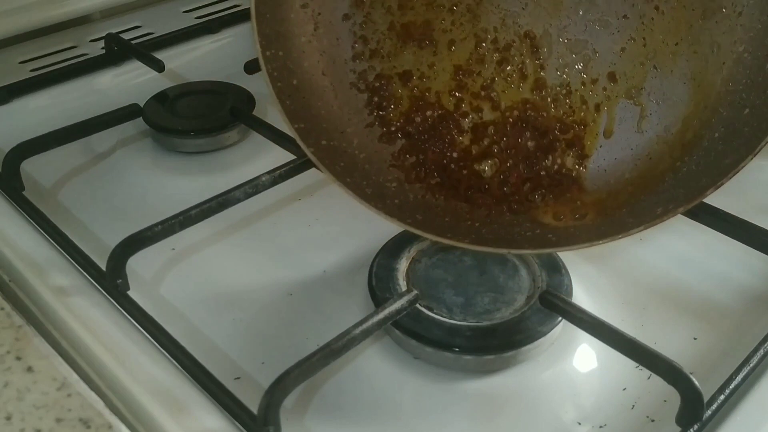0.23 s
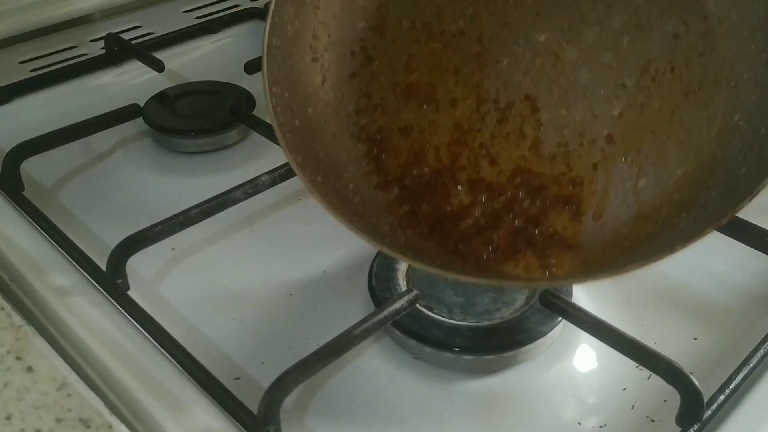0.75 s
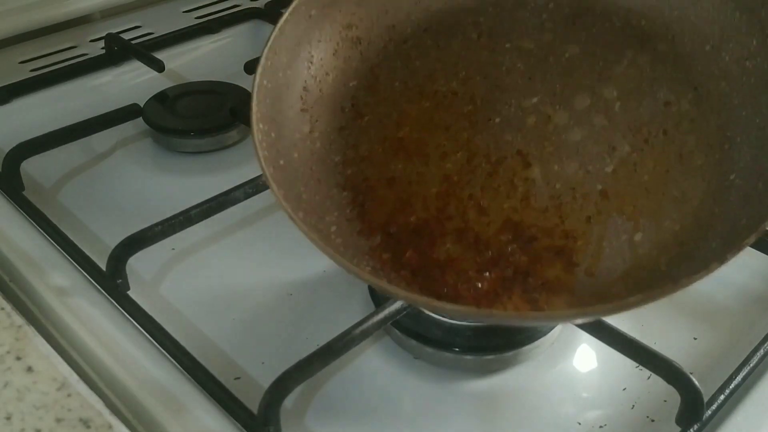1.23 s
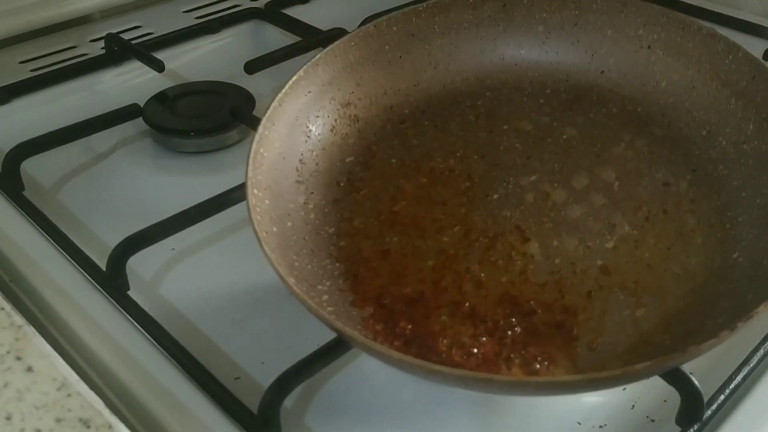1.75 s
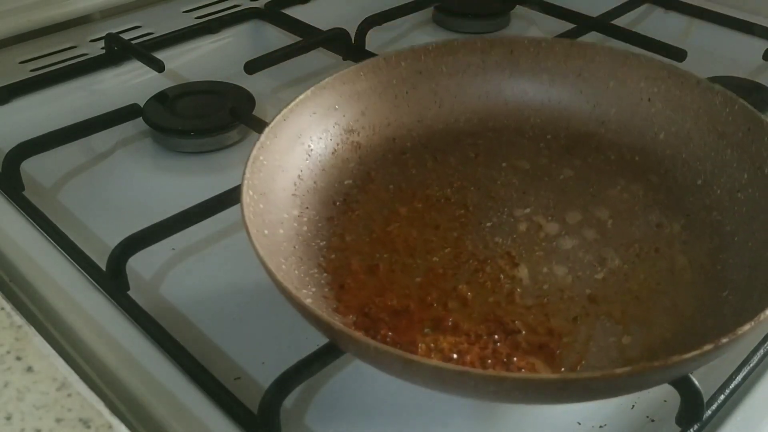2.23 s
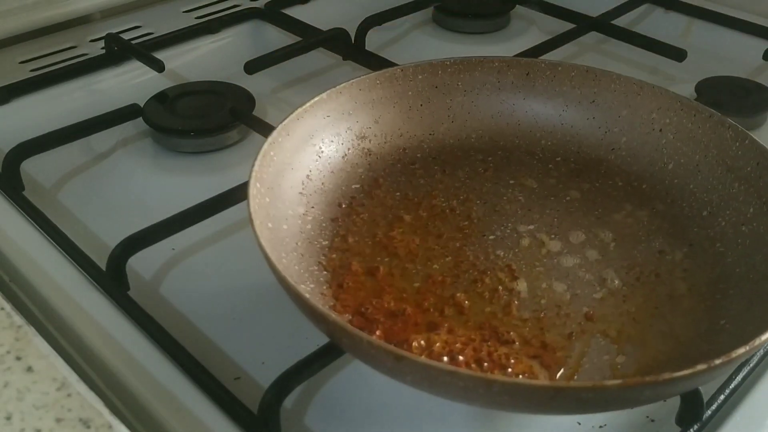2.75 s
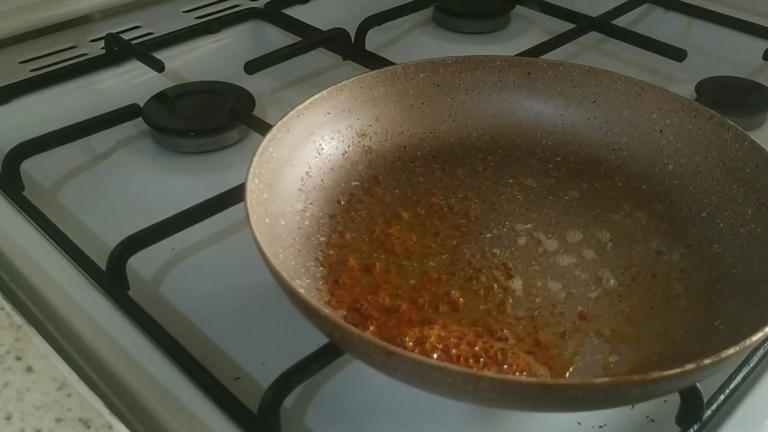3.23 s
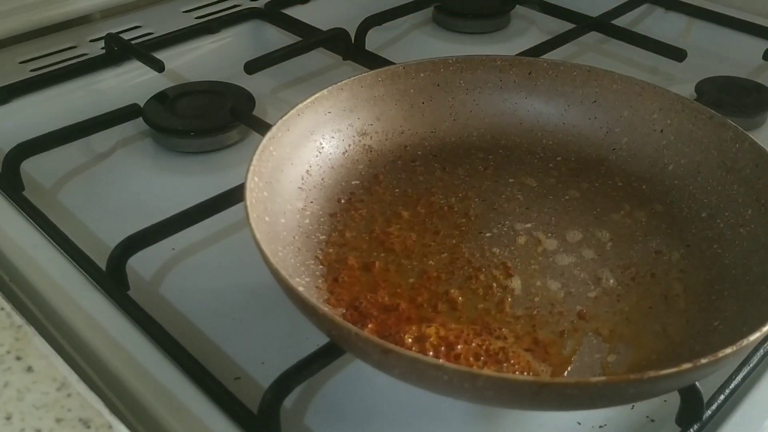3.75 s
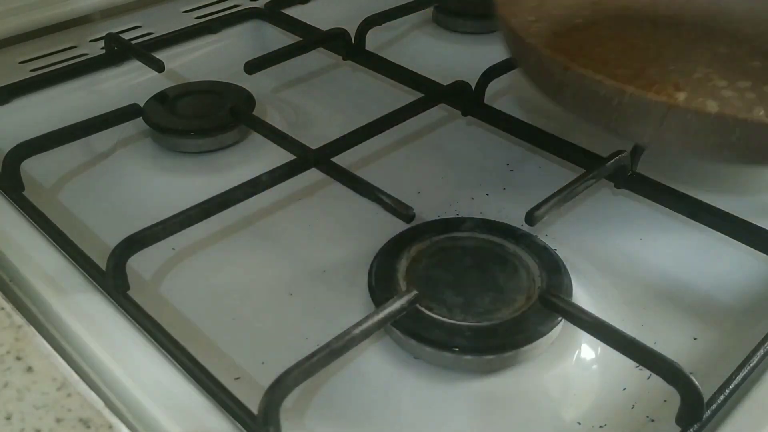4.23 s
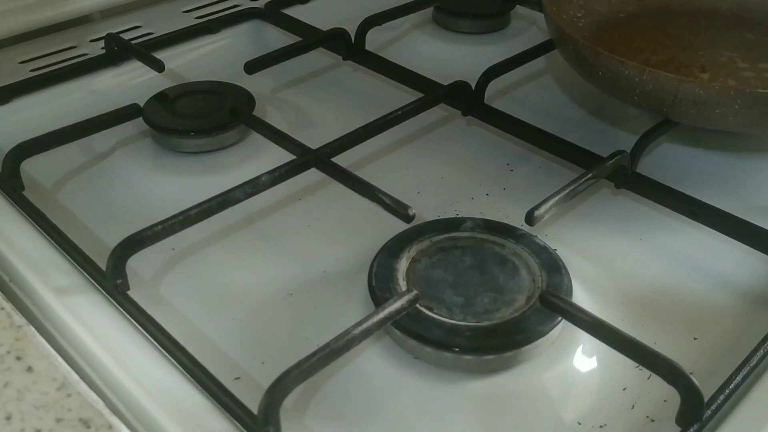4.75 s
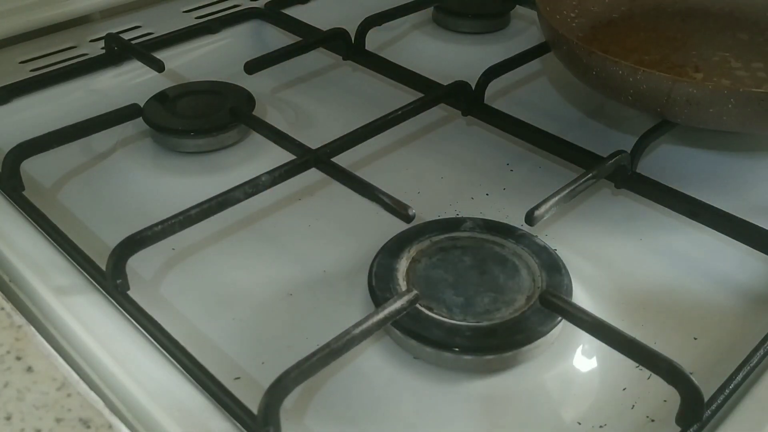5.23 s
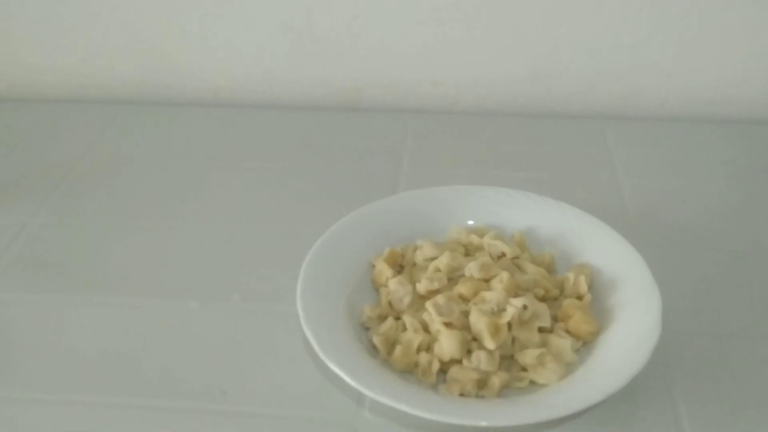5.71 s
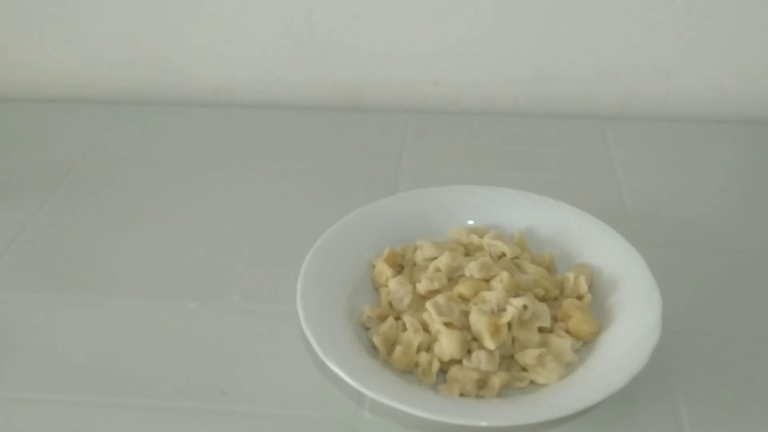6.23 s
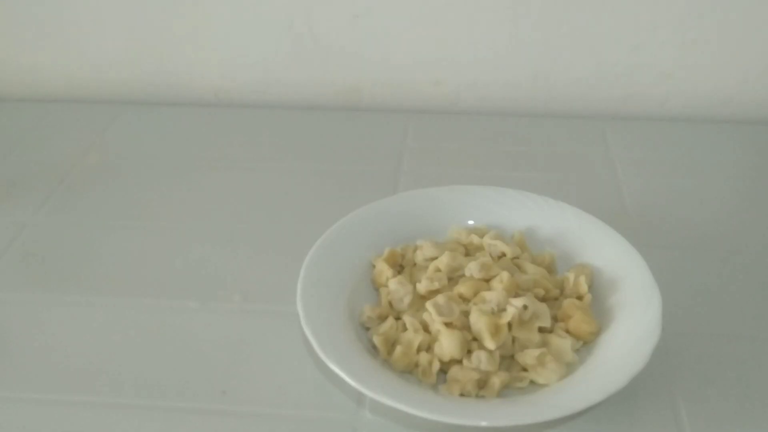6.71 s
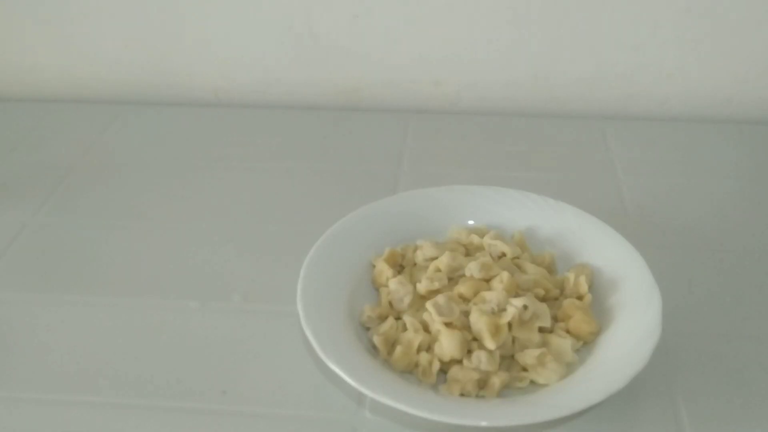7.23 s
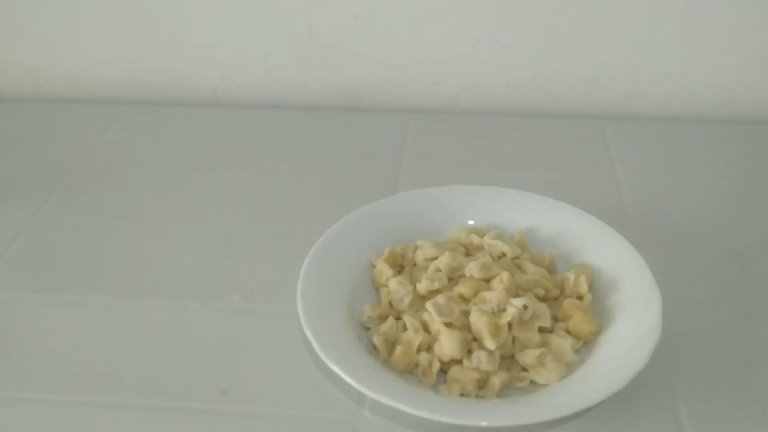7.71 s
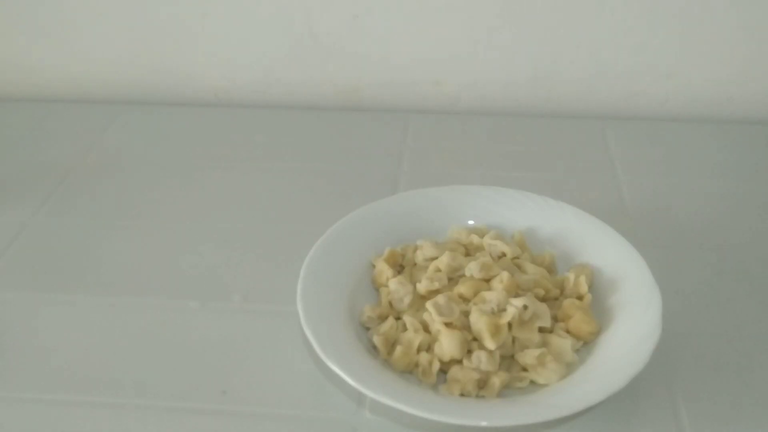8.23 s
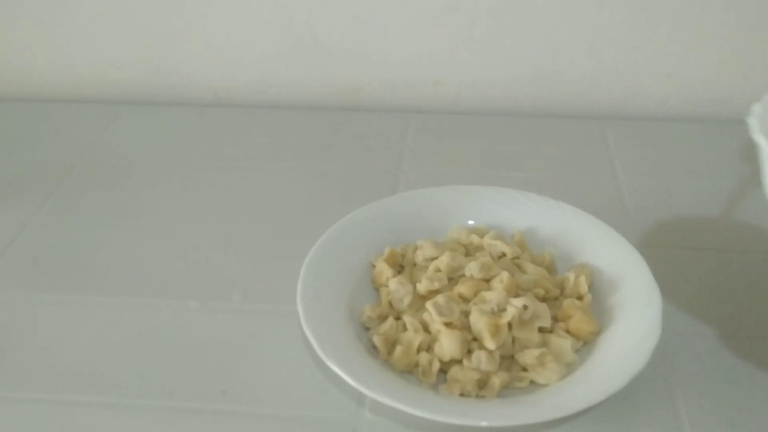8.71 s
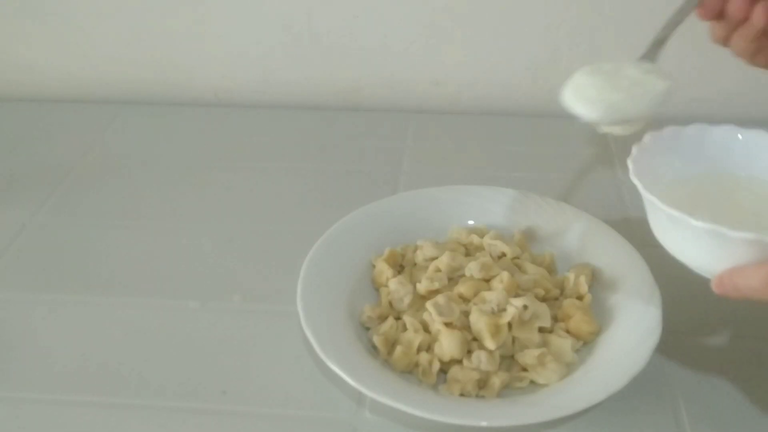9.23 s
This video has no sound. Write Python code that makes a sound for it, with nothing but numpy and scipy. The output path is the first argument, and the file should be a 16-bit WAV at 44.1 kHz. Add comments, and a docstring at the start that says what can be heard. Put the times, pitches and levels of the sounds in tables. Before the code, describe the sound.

A low, steady fridge hum fills a small kitchen, with a faint fizz of cooling oil that dies down over the first seconds. Tiny oil ticks come at about 1.4 seconds and again between 2 and 2.5. A frying pan knocks on the stove's iron grate at about 1.7 and 2.4 seconds, then gives a sharp, louder clack at 2.8 and another at 3.9. Each knock has a short metallic ring and a slight thud from the stove top. A duller knock follows at 4.8 seconds, and the pan settles with a quick clatter around 5.1. At about 5.6 seconds the sound drops out briefly and fades back in as a much quieter hum. A spoon clinks in a china bowl at about 7.2, 7.5 and 7.8 seconds, to the left, each clink softer. Only the quiet hum remains until the end.

```python
"""A fridge hums and cooling oil fizzes and ticks; then a frying pan knocks on a stove's iron grate.
Each impact excites the damped modes of pan, grate and sheet metal top; the longer the contact,
the duller the crack. The sound drops out and fades back in at a quieter table, where a spoon
clinks in a china bowl and sets its high modes ringing. Room reflections follow every impact."""
import sys
import numpy as np
from scipy import signal
from scipy.io import wavfile
from scipy.ndimage import uniform_filter1d

SR = 44100
rng = np.random.default_rng(int(sys.argv[2]) if len(sys.argv) > 2 else 0)


def waveform_to_disk(signal):
    """Save audio, clipped to [-1, 1], as 16-bit WAV at the path in sys.argv[1]."""
    frames = np.transpose(np.atleast_2d(signal))
    scaled = np.clip(frames, -1, 1) * 32767
    samples = np.round(scaled).astype(np.int16)
    wavfile.write(sys.argv[1], SR, samples)


N = 417627

# Noise spectra. Each row: frequency in Hz, relative spectral density in dB.
STOVE_AIR_SPECTRUM = [(12, -40), (25, -24), (70, -5), (104, -9.5), (150, -20.5), (200, -18), (330, -23),
                      (400, -27), (590, -28.5), (1500, -40), (3000, -40), (10000, -41), (13000, -45),
                      (16000, -44.5)]
TABLE_AIR_SPECTRUM = [(12, -61), (20, -3), (90, -5.5), (247, -13), (335, -10.5), (431, -16), (539, -15.5),
                      (1110, -27), (3130, -30.5), (3600, -29.5), (10700, -32.5), (14500, -35.5),
                      (15800, -43)]
FIZZ_SPECTRUM = [(2000, -21), (3500, -7.5), (5000, 0), (8500, 3), (11000, -0.5), (13500, -0.5),
                 (16000, -27)]
# Wavering tones of the hum. Each row: frequency in Hz, bandwidth in Hz, level in dB.
STOVE_HUM_TONES = [(50.9, 2.7, -59), (77.8, 1.4, -59.5), (129, 4, -66), (189.3, 7.6, -60.5),
                   (232, 0.15, -64.5), (341.3, 3.3, -68.5), (468, 0.33, -67), (522, 1.2, -72)]
TABLE_HUM_TONES = [(67.8, 12, -56.5), (74.5, 4, -79), (182, 2.1, -63), (196, 0.41, -58),
                   (338.4, 2.6, -58.5), (475, 1.5, -68.5), (530.6, 1.1, -66), (633, 5.9, -73),
                   (3100, 90, -76.5)]
# Diffuse field. Each row: frequency in Hz, left-right coherence from 0 to 1.
COHERENCE = [(60, .97), (130, .98), (290, .82), (640, .5), (1400, 0), (15000, .05)]
# Reverberation. Each row: frequency in Hz, time to decay by 60 dB (t60) in seconds.
ROOM_T60 = [(150, .3), (500, .3), (1500, .25), (5000, .23), (9000, .2), (14000, .16)]
# Oil ticks. Each row: start in seconds, level in dB, centre in Hz, left over right in dB.
OIL_TICKS = [(1.353, -44, 8900, 0), (1.449, -40, 11400, 5), (2.17, -55, 7080, 14),
             (2.177, -53.5, 6000, -22), (2.503, -47, 7940, -6.5), (2.523, -42, 11400, 9),
             (3.399, -50, 6900, -13), (5.786, -51, 8170, 14)]
# Normal modes. Each row: frequency in Hz, relative level in dB, t60 in seconds.
BOWL_MODES = [(1396, -21, 0.16), (3420, -7, 0.1), (3500, -9.5, 0.17), (3570, -8.5, 0.07), (5200, -16, 0.08),
              (6170, -3, 0.055), (6194, 5.5, 0.068), (6250, 5, 0.044), (6480, 0, 0.043), (6900, -11, 0.07),
              (7540, -15, .07), (9240, -2, 0.026), (10500, -14, .03), (12390, 1, 0.021), (14500, -7, .04)]
PAN_MODES = [(544.4, -4, 0.36), (653, -12, 0.21), (862.5, -3, 0.31), (1075, -5, 0.12), (1222, -11, 0.31),
             (1550, -1.5, 0.083), (1693, -5, 0.092), (2190, -5.5, 0.11), (2720, -26, 0.095)]
GRATE_MODES = [(793, -5, 0.13), (978, -10, 0.1), (1185, -11.5, 0.088), (1374, 3, 0.1), (1421, -12.5, .2),
               (1554, -12, 0.099), (1890, -21, 0.13), (2117, -9, 0.21), (2200, -8, 0.089),
               (2576, -14.5, 0.21), (2942, 0.5, 0.15), (3910, -2, 0.061), (4604, -9, 0.13), (5500, -13, .1)]
STOVE_TOP_MODES = [(74, -5, .3), (123.5, 5, 0.45), (184.7, 6, 0.32), (226, 3, 0.4), (276, -12, 0.4)]
# Spoon on bowl. Each row: start in seconds, strength in dB, crack and ring in dB relative to it,
# lean to the upper cluster mode in dB, dullness in dB per octave, crack's upper edge in Hz.
SPOON_CLINKS = [(7.240, -20, -9, -3, -1.5, 0, 15000), (7.5377, -27.5, -5, -17, -6, 2, 13900),
                (7.837, -33.5, -4, -2.5, 10.5, 2.5, 4570), (8.177, -61, -6, 0, 12.5, 0, 7000)]
# Pan on grate. Each row: start in seconds, strength in dB, contact in ms, crack, pan ring, grate ring
# and thud in dB relative to the strength, dullness in dB per octave, clatter's lower edge in Hz,
# treble left over right in dB, clack pitch in Hz, clack in relative dB, clack t60 in seconds.
PAN_KNOCKS = [(1.748, -21.5, 1.6, -40, -10, -28, -21, 8, 940, 6, 740, -7, 0.022),
              (2.449, -24, 2.4, -7, -22, -11.5, -42, 3.5, 805, -15, 769, -3, .14),
              (2.451, -34, .8, -7.5, -30, -2.5, -40, 0, 1900, -4, 2204, 10, 0.046),
              (2.770, -9.5, 0.16, -6.5, -19.5, -14.5, -23, 1.5, 750, 14, 852, -3.5, 0.041),
              (2.777, -23.5, .5, -8.5, -17, -11.5, -20.5, 2, 1700, 3, 2190, 3.5, .05),
              (3.783, -35, 0.77, -10, -15.5, -16, -16, 5, 845, 9, 1154, 3, 0.026),
              (3.904, -14, 0.21, -19, -30, -18, -29.5, 11, 473, -12, 1100, -6.5, .03),
              (4.755, -28, 3.12, -3, -10.5, 2, -11, 5, 420, -11.5, 836, 7, 0.037),
              (5.000, -60.5, 7, -38, 15, -4, -13.5, 33, 450, -2, 540, -8.5, .03),
              (5.104, -27, 1.9, 7, -13, -4, -18.5, -1.5, 350, 8, 1180, 2.5, 0.052),
              (5.112, -24, 2.36, 2.5, -11, 1, -18.5, 1, 350, 17, 657, 0.5, 0.042),
              (5.129, -29, 1.8, -20, -17, -4, -25.5, 5, 350, 3, 810, -3, .04)]

PAN_MOVED_S, TABLE_START_S = 4.2, 5.58  # pan to the back burner; scene to the table


def amp(db):
    """Amplitude grows tenfold for every 20 dB."""
    return 10 ** (np.asarray(db) / 20)


def unit_rms(x):
    """Dividing by the root mean square gives unit power."""
    return x / np.sqrt(np.mean(x ** 2) + 1e-20)


def curve_at(points, hz):
    """Interpolation along a logarithmic frequency axis, returned as a column."""
    knots_hz, values = np.transpose(points)
    return np.interp(np.log(hz + 1), np.log(knots_hz + 1), values)[:, None]


def bandpass(x, low_hz, high_hz):
    """A third-order band filter attenuates both sides of its passband."""
    return signal.sosfilt(signal.butter(3, [low_hz, min(high_hz, 18000)], "band", fs=SR, output="sos"), x)


def place(mix, start_s, sound, left_db, left_lag_ms):
    """Differences of level and arrival time between the channels give a sound its direction."""
    for side, sign in enumerate((1, -1)):
        arrival_s = start_s + max(sign * left_lag_ms, 0) / 1000
        part = mix[side, round(arrival_s * SR):][:len(sound)]
        part += sound[:len(part)] * amp(sign * left_db / 2)


def diffuse_pair(left, independent, hz):
    """In a diffuse field, long waves reach both sides alike and short waves are incoherent."""
    coherence = curve_at(COHERENCE, hz)
    return np.array([left, coherence * left + np.sqrt(1 - coherence ** 2) * independent])


def hiss(spectrum, flicker_db):
    """Random short-time spectra sum to coloured noise, whose level flickers in patches."""
    frames, hz = N // 512 + 5, np.fft.rfftfreq(2048, 1 / SR)
    left_re, left_im, other_re, other_im, patches = rng.standard_normal((frames, len(hz), 5)).T
    patches = unit_rms(uniform_filter1d(uniform_filter1d(patches, size=16, axis=0), size=6, axis=1))
    spectra = diffuse_pair(left_re + 1j * left_im, other_re + 1j * other_im, hz)
    spectra *= amp(curve_at(spectrum, hz) + flicker_db * patches)
    return unit_rms(signal.istft(spectra, nperseg=2048, noverlap=1536)[1][:, :N])


def crack(db, t60, rise_s):
    """Many dense modes dying at once are heard as an exponentially decaying burst of noise."""
    t = np.arange(SR // 2) / SR
    return amp(db - 60 * t / t60) * rng.standard_normal(len(t)) * (1 - np.exp(-t / rise_s))


def ring(modes, db, rise_s, spread, dull_db=0):
    """Free vibration is a sum of damped modes; each beats with two weaker, detuned twins."""
    t, sound = np.arange(SR // 2) / SR, 0
    for (hz, mode_db, t60), (phase, *draws) in zip(modes, rng.random((len(modes), 5))):
        missed_db = dull_db * max(np.log2(hz / 600), 0)  # a dull blow misses the higher modes
        twins = sum(np.sin(2 * np.pi * (hz * (1 + spread * (detune - .5)) * t + twin_phase))
                    for detune, twin_phase in (draws[:2], draws[2:]))
        envelope = amp(mode_db - missed_db - 60 * t / t60)
        sound = sound + envelope * (np.sin(2 * np.pi * (hz * t + phase)) + 0.44 * twins)
    return amp(db) * sound * (1 - np.exp(-t / rise_s))


def fridge_hum(tones, buzz_db, motor_share, waver):
    """The motor runs just behind the mains buzz, so the two beat; other tones waver in level and phase."""
    buzz_hz, beat_hz, beat_null_s = 99.75, 1.718, 8.37
    t = np.arange(N) / SR - beat_null_s
    motor = motor_share * np.sin(2 * np.pi * (buzz_hz - beat_hz) * t)
    hum = np.sqrt(2) * amp(buzz_db) * (np.sin(2 * np.pi * buzz_hz * t) - motor)
    slow_t = t[::200]
    for hz, width_hz, db in tones:
        pole = np.exp(-np.pi * width_hz * (slow_t[1] - slow_t[0]))
        drifts = signal.lfilter([1], [1, -pole], rng.standard_normal((2, len(slow_t))))
        in_phase, quadrature = (waver * np.interp(t, slow_t, unit_rms(drift)) for drift in drifts)
        phase = 2 * np.pi * hz * t
        hum += amp(db) * unit_rms((1 + in_phase) * np.cos(phase) + quadrature * np.sin(phase))
    return hum


def room_echoes(sound):
    """Reverberation is a sum of reflections of random sign, each band decaying at its own rate."""
    taps = np.zeros((2, SR // 2))
    slots = np.arange(100, SR // 2 - 20, 20)
    arrivals = slots + rng.integers(0, 20, (2, len(slots)))
    np.put_along_axis(taps, arrivals, rng.choice([-1., 1.], arrivals.shape), 1)
    hz, t, (left, independent) = signal.stft(taps, SR, nperseg=256)
    decay = amp(-60 * t / curve_at(ROOM_T60, hz))
    tail = signal.istft(diffuse_pair(left, independent, hz) * decay, SR, nperseg=256)[1]
    return signal.oaconvolve(sound.mean(0)[None], tail / np.linalg.norm(tail[0]), axes=1)[:, :N]


def oil_fizz(t):
    """The fizz level relaxes exponentially as the oil cools, and drops as the pan moves away."""
    start_db, settled_db, cooling_s = -55, -67.5, 1.74
    cooling_db = settled_db + (start_db - settled_db) * np.exp(-t / cooling_s)
    distance_db = -11 * np.clip(t - PAN_MOVED_S, 0, 1)
    return amp(cooling_db + distance_db) * hiss(FIZZ_SPECTRUM, flicker_db=0.94)


def oil_ticks(mix):
    """A brief pulse has a broad spectrum: each tick is a bright snap with a faint spray behind it."""
    for start_s, db, hz, left_db in OIL_TICKS:
        snap = crack(db + 8.5, t60=0.01, rise_s=.0001)
        spray = crack(db - 2.5, t60=0.045, rise_s=0.00055)
        place(mix, start_s, bandpass(snap + spray, 0.46 * hz, 1.9 * hz), left_db, left_lag_ms=.1)


def spoon_clinks():
    """Impact excites the bowl's modes; the point of contact sets the balance in a close cluster."""
    rings, snaps = np.zeros((2, 2, N))
    low_hz, split_hz, high_hz = 3300, 3550, 3700  # the cluster
    for start_s, db, crack_db, ring_db, lean_db, dull_db, top_hz in SPOON_CLINKS:
        click = bandpass(crack(db, t60=0.0092, rise_s=0.00027), 1600, 13500)
        snap = click + bandpass(crack(db + crack_db, t60=0.05, rise_s=0.00068), 1470, top_hz)
        modes = [(hz, mode_db + lean_db * np.sign(hz - split_hz) * (low_hz < hz < high_hz), t60)
                 for hz, mode_db, t60 in BOWL_MODES]
        bowl = ring(modes, db + ring_db, rise_s=0.001, spread=0.023, dull_db=dull_db)
        for mix, sound in ((snaps, snap), (rings, bowl)):
            place(mix, start_s, sound, left_db=15.5, left_lag_ms=-.4)
    return rings, snaps


def contact_crack(db, crack_db, contact_ms):
    """Contact time limits bandwidth: a longer blow has a weaker first click and a duller crack."""
    top_hz = 11700 / (1 + contact_ms / 2.8)
    click = crack(db - 0.5 - 19 * contact_ms, t60=0.023, rise_s=.0001)
    body = crack(db + crack_db, t60=0.07, rise_s=contact_ms / 1000)
    sharp = bandpass(click + body, 730, top_hz)
    hollow_band = signal.lfilter(*signal.butter(1, (3900, 6970), "band", fs=SR), sharp)
    return sharp - 0.57 * hollow_band


def stove_thud(db):
    """The sheet metal top vibrates in low plate modes while the stove shudders loosely."""
    shudder = bandpass(crack(db + 33.5, t60=0.14, rise_s=0.078), 98, 387)
    return ring(STOVE_TOP_MODES, db, rise_s=0.028, spread=0.036) + shudder


def pan_knocks():
    """Impact rings pan, grate and stove top; diffraction brings all but the crack level to both sides."""
    rings, noise = np.zeros((2, 2, N))
    for (start_s, db, contact_ms, crack_db, pan_db, grate_db, thud_db, dull_db,
         low_hz, left_db, clack_hz, clack_db, clack_t60) in PAN_KNOCKS:
        contact_s = contact_ms / 1000
        lag_ms = 0.18 if start_s < PAN_MOVED_S else -.095  # front burner, then back burner
        place(noise, start_s, contact_crack(db, crack_db, contact_ms), left_db, lag_ms)
        clatter = crack(db, t60=0.029 + 0.044 * contact_ms, rise_s=contact_s)
        place(noise, start_s, bandpass(clatter, low_hz, 2420), 0, lag_ms)
        pan = ring(PAN_MODES, db + pan_db, contact_s, spread=0.016, dull_db=dull_db)
        grate = ring(GRATE_MODES, db + grate_db, contact_s, spread=0.023, dull_db=dull_db)
        # the struck spot gives one short note; the more damped it is, the wider its twins lie
        clack = ring([(clack_hz, clack_db, clack_t60)], db, contact_s + 0.00029, spread=0.011 / clack_t60)
        place(rings, start_s, pan + grate + clack, 0, lag_ms)
        place(rings, start_s, stove_thud(db + thud_db), 0, 0)
    return rings, noise


def scene():
    """Superposition: direct impacts and their reflections add to the background of each place."""
    t = np.arange(N) / SR
    stove_rings, stove_snaps = pan_knocks()
    oil_ticks(stove_snaps)
    bowl_rings, bowl_snaps = spoon_clinks()
    snaps = stove_snaps + bowl_snaps
    echoes = room_echoes(amp(1) * snaps + amp(-5) * stove_rings + amp(-1.5) * bowl_rings)
    stove = oil_fizz(t) + amp(-47) * hiss(STOVE_AIR_SPECTRUM, flicker_db=1.5)
    stove += fridge_hum(STOVE_HUM_TONES, buzz_db=-41, motor_share=0.0063, waver=1) * amp([[-.6], [.6]])
    table = amp(-49.5) * hiss(TABLE_AIR_SPECTRUM, flicker_db=1.1)
    table += fridge_hum(TABLE_HUM_TONES, buzz_db=-50.5, motor_share=0.94, waver=.35)
    return snaps + stove_rings + bowl_rings + echoes + np.where(t < TABLE_START_S, stove, table)


def record(dry):
    """A gain envelope drops out and fades in between the two places; a low-pass limits the band."""
    t = np.arange(N) / SR
    drop_s, return_s, fade_s = 5.563, 5.581, 0.13
    fade_in_db = -6 - 13 * np.exp(-(np.maximum(t - return_s, 0) / fade_s) ** 2)
    gain = amp(-3.5) * (t < drop_s) + amp(fade_in_db) * (t > return_s)
    faded = dry * uniform_filter1d(gain, size=130)
    lowpass = signal.firwin(511, 15900, window=("kaiser", 9), fs=SR)
    return signal.oaconvolve(faded, lowpass[None], "same")


dry = scene()
out = record(dry)
waveform_to_disk(out)
```